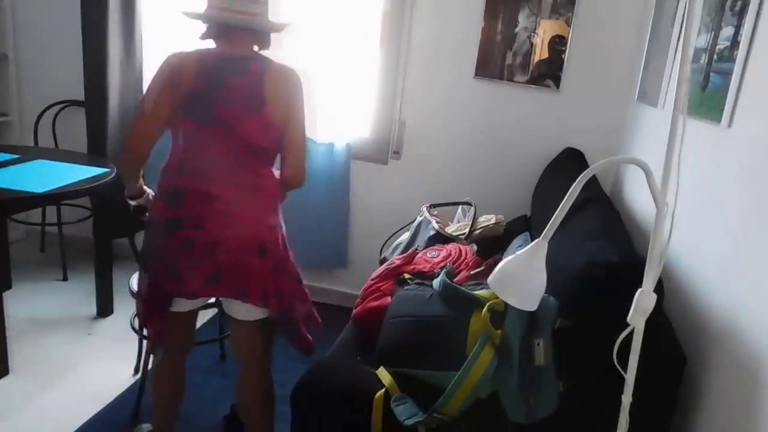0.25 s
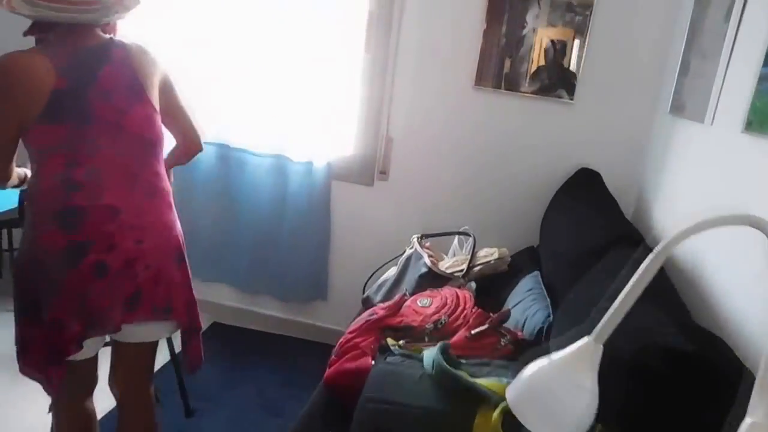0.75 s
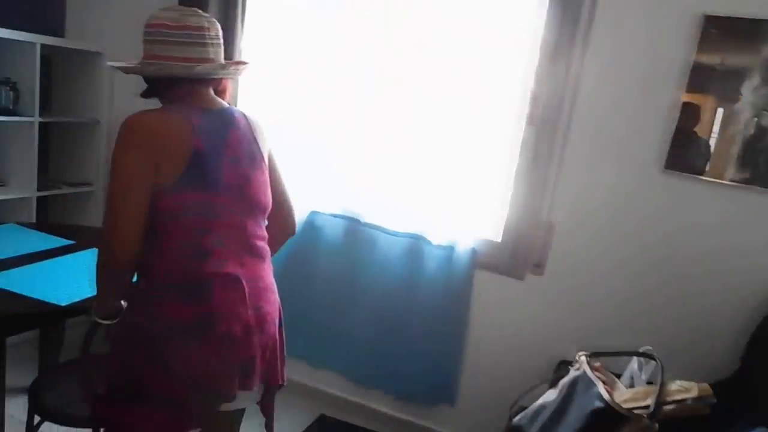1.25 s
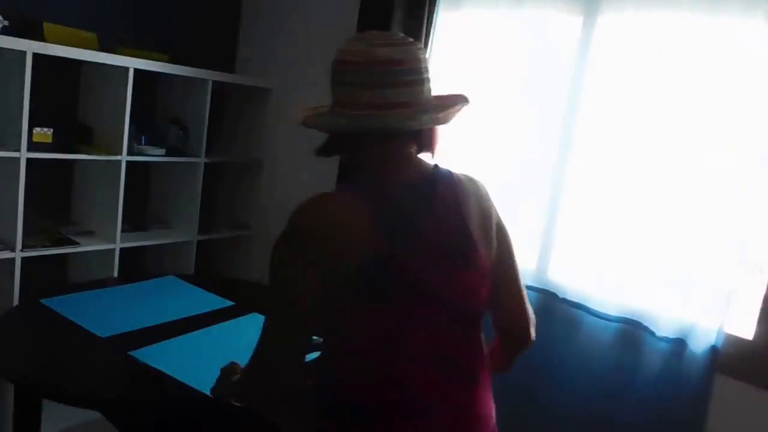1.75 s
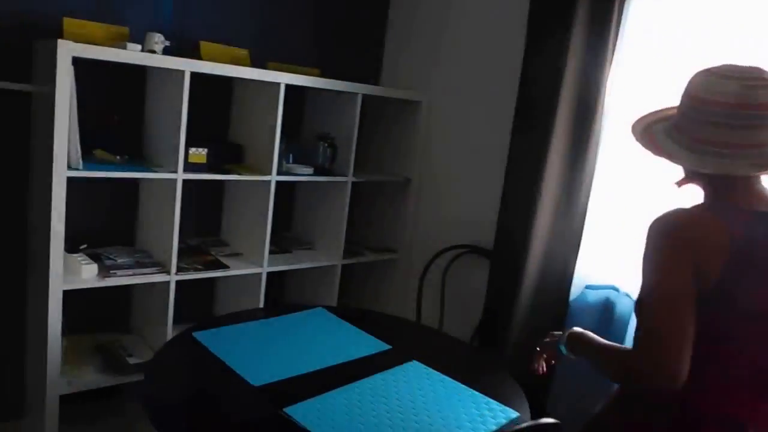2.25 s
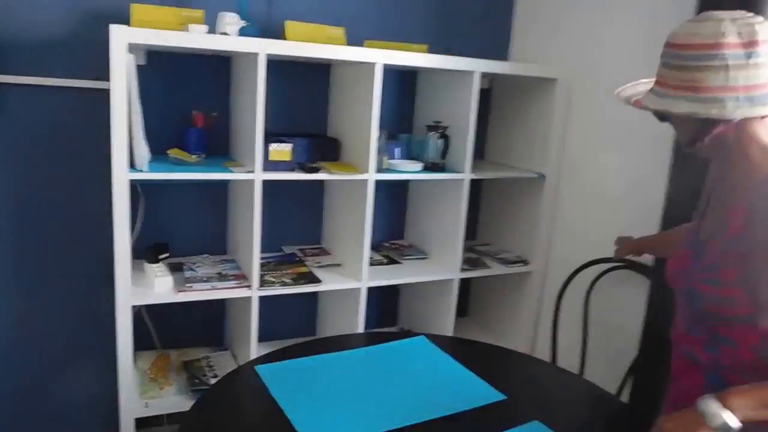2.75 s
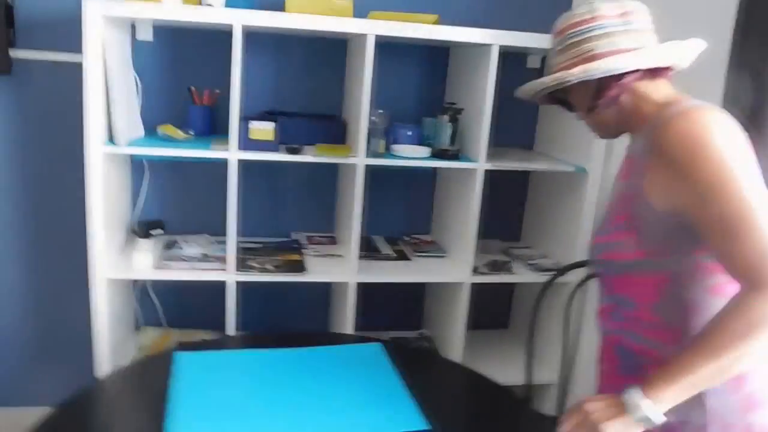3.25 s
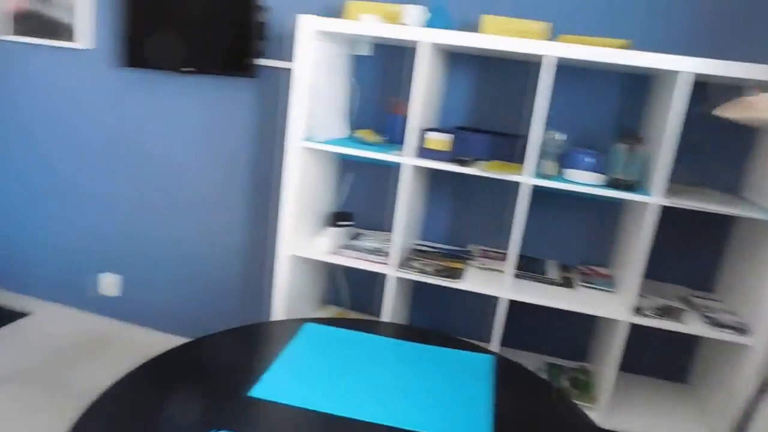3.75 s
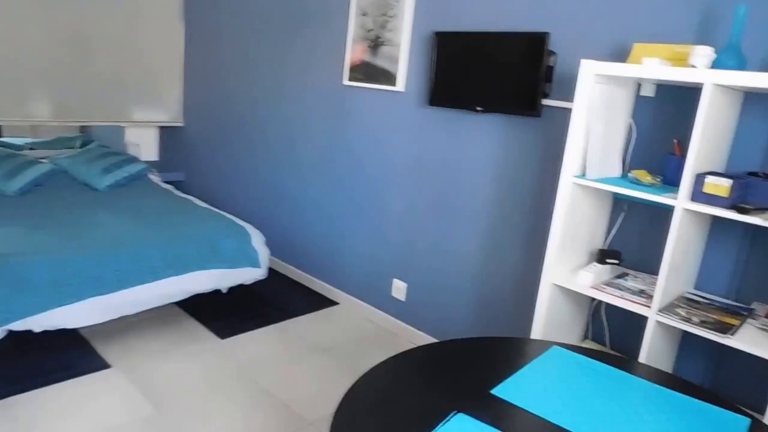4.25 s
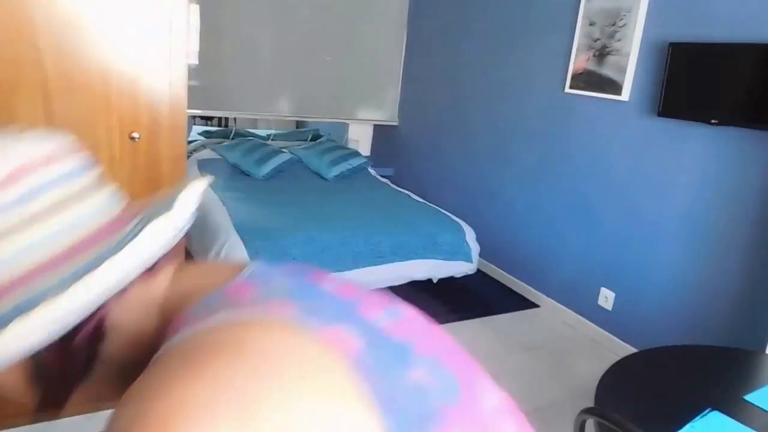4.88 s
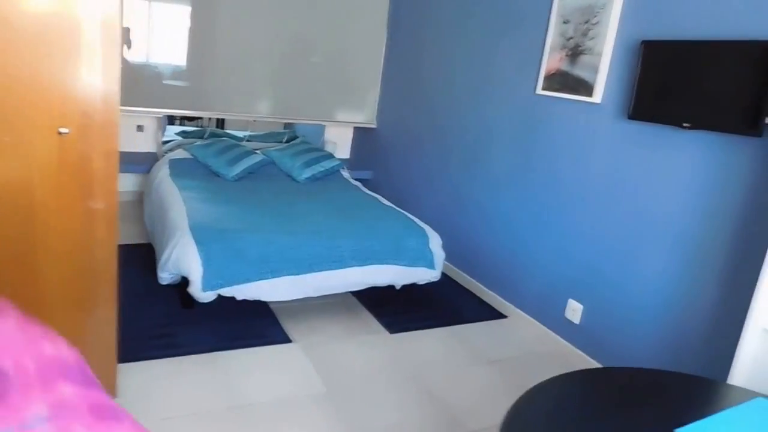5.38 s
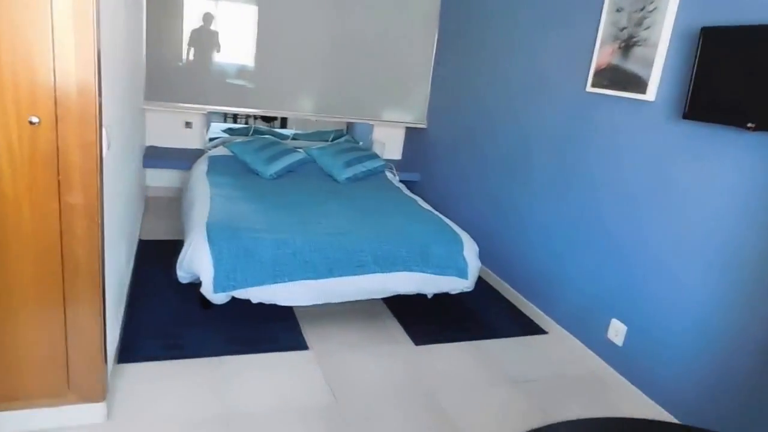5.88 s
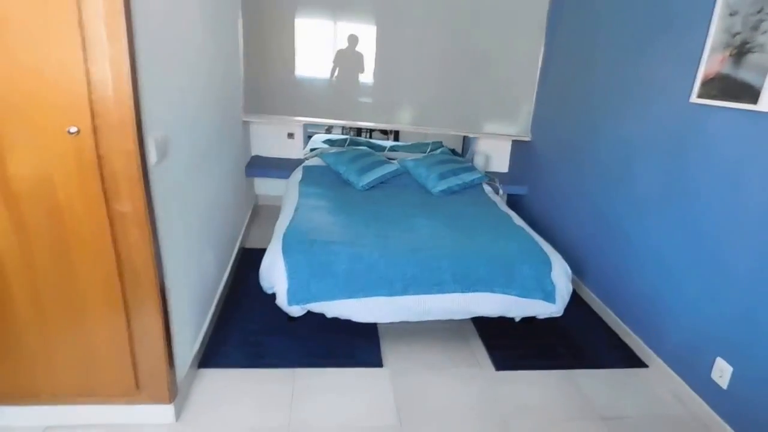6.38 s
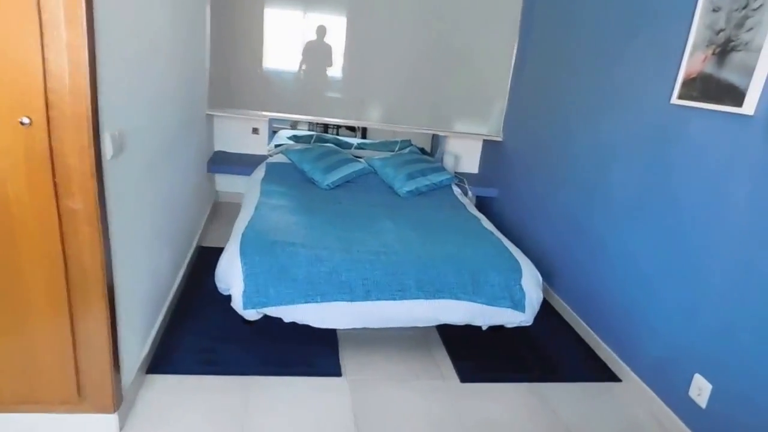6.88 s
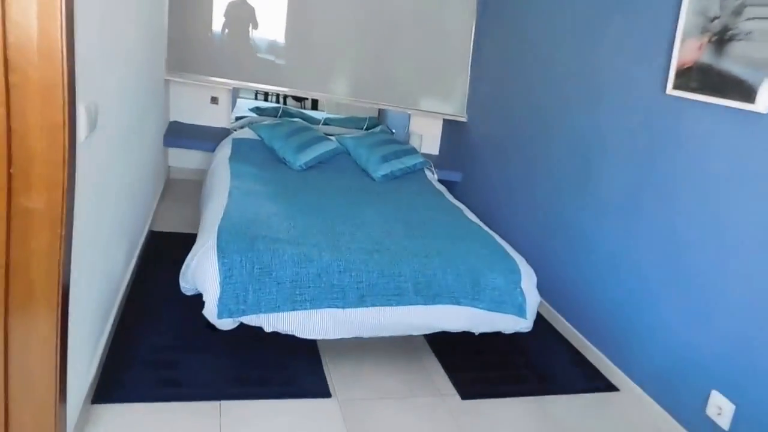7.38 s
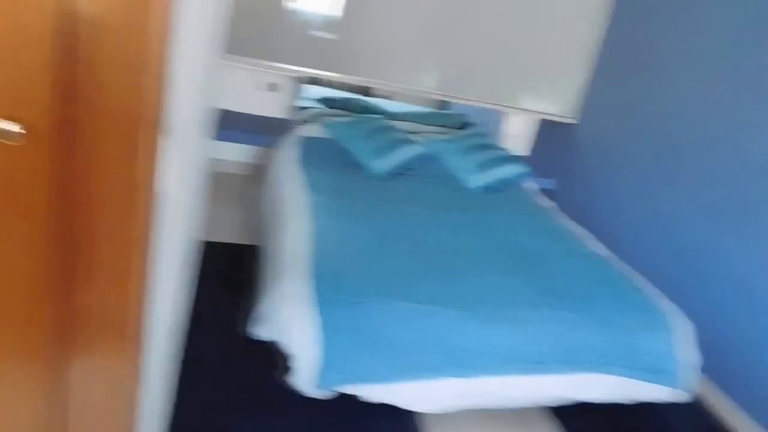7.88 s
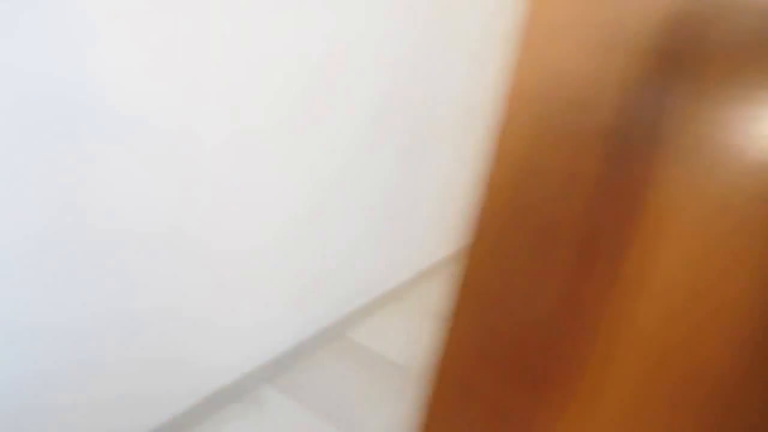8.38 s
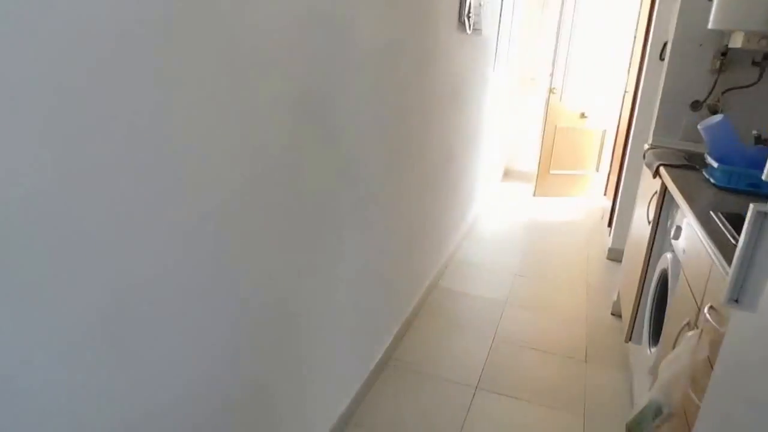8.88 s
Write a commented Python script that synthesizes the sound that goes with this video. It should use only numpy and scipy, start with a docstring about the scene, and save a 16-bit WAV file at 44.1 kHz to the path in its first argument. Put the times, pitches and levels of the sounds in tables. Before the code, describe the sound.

Two rough, squeaky scrapes of a tubular chair on a tiled floor, a pause between them, followed by faint shuffling, clicks and hiss.

```python
"""Close stereo take in a small, quiet, hard-walled room: hiss, faint hum, cloth, a tick and a soft step.
From 1.2 s a tubular metal chair is dragged over tiles, and after a pause with soft steps again from 3.1 s:
random micro-impacts grind, noise blows knock at tile joints, harmonic stacks squeal, single tones sing.
After 4.5 s thuds and a rustle, a low falling chirp and a dull tap follow; steps, ticks and swishes,
made of filtered noise bursts, run on to the end over the shuffling hiss."""
import sys
import numpy as np
from scipy import signal
from scipy.fft import rfft, irfft, next_fast_len
from scipy.io import wavfile
from scipy.ndimage import map_coordinates

SR = 44100
rng = np.random.default_rng(int(sys.argv[2]) if len(sys.argv) > 2 else 0)


def wrap_up_sound(samples):
    """Save the sound to the file named by the first command line argument, as 16-bit audio."""
    columns = np.atleast_2d(samples).T
    # keep every value between -1 and 1, then stretch to whole-number steps
    tamed = np.clip(columns, -1, 1)
    steps = np.round(tamed * 32767).astype(np.int16)
    wavfile.write(sys.argv[1], SR, steps)


def makeup_ratio(level_db):
    """Linear amplitude ratio for a level in decibels (20 dB per factor of ten)."""
    decades = np.asarray(level_db, float) / 20
    return 10 ** decades


N = 403074

# resonances of the chair's tubes: pitch_hz, width_hz, level_db (over the plain force)
FRAME_MODES = [(252, 12, 4), (318, 20, 3), (380, 20, 2), (620, 35, -1), (695, 35, -2), (835, 35, -1),
               (890, 30, 1), (965, 30, 1), (1085, 30, 2), (1140, 30, 1), (1240, 35, -3), (1375, 35, -4),
               (1468, 25, 2), (1530, 35, 0), (1620, 35, 2), (1720, 35, 1), (1790, 35, 1), (1890, 35, 2),
               (1960, 35, 0), (2020, 35, 1), (2070, 35, 1), (2190, 35, 2), (2300, 35, 2), (2380, 35, 2),
               (2480, 40, 1), (2570, 40, 2), (2700, 40, 1), (2840, 45, -1), (3190, 45, -1), (3620, 50, 1),
               (3790, 50, 0), (4600, 80, 0), (5500, 90, 0), (5810, 150, 2), (6760, 60, 1), (7500, 60, 2),
               (8200, 100, 1)]


def rms_one(x):
    """Scale to rms 1."""
    return x / np.sqrt(np.mean(x ** 2) + 1e-20)


def in_time(rows, fade_s):
    """Columns as curves per sample, after a gate that fades in and out at the table's ends."""
    s, *columns = np.transpose(rows)
    t = np.arange(N) / SR
    gate = np.clip(np.minimum(t - s[0], s[-1] - t) / fade_s, 0, 1)
    return [gate] + [np.interp(t, s, c) for c in columns]


def colour(x, points):
    """Shape a steady signal by a spectrum of (Hz, dB) points, joined over log frequency."""
    size = next_fast_len(x.shape[-1])
    hz = np.maximum(np.arange(size // 2 + 1) * SR / size, 1)
    point_hz, point_db = np.transpose(points)
    gain = makeup_ratio(np.interp(np.log(hz), np.log(point_hz), point_db))
    return irfft(rfft(x, size) * gain, size)[..., :x.shape[-1]]


def band(x, low_hz, high_hz):
    """Butterworth band-pass."""
    edges_hz = [low_hz, min(high_hz, .45 * SR)]
    return signal.sosfilt(signal.butter(3, edges_hz, "band", fs=SR, output="sos"), x)


def flutter_noise(low_hz, high_hz):
    """Band of noise with rms 1, for fast uneven modulation."""
    return rms_one(band(rng.standard_normal(N), low_hz, high_hz))


def drift(rate_hz):
    """Slow random wander of rms 1, drawn at 60 points a second."""
    steps = rng.standard_normal(int(N / SR * 60) + 2)
    r = np.exp(-2 * np.pi * rate_hz / 60)
    wander = rms_one(signal.lfilter([1], [1, -r], steps))
    return np.interp(np.arange(N) * 60 / SR, np.arange(len(steps)), wander)


def resonate(x, hz, width_hz):
    """Two-pole resonance with gain 1 on top."""
    r = np.exp(-np.pi * width_hz / SR)
    zeros = np.array([1, 0, -1]) * (1 - r * r) / 2
    return signal.lfilter(zeros, [1, -2 * r * np.cos(2 * np.pi * hz / SR), r * r], x)


def bursts(events, shape):
    """Place a dying noise burst, filtered by shape and scaled to its peak, at each event."""
    out, t = np.zeros(N + SR), np.arange(SR // 2) / SR
    noises = rng.standard_normal((len(events), SR // 2))
    for (s, peak_db, hz, t60_s), noise in zip(events, noises):
        burst = shape(noise * makeup_ratio(-60 * t / max(t60_s, .002)), hz)
        at = round(s * SR)
        out[at:at + len(t)] += burst / np.abs(burst).max() * makeup_ratio(peak_db)
    return out[:N]


def roll_in(rise_s):
    """Linear rise that softens the start of a burst."""
    return np.minimum(np.arange(SR // 2) / (rise_s * SR), 1)


def left_right(pan_db):
    """Gains of left and right that differ by pan_db."""
    return makeup_ratio(np.array([[pan_db], [-pan_db]]) / 2)


def swell_db(s, held_s):
    """Time since the start, and an envelope in dB that swells, holds and dies."""
    catch_db_per_s, let_go_db_per_s = 702, 461
    t = np.arange(N) / SR - s
    return t, np.minimum(0, np.minimum(catch_db_per_s * t, let_go_db_per_s * (held_s - t)))


def hum():
    """Faint hum: narrow bands of noise, each 12 Hz wide."""
    # low hum bands: pitch_hz, level_db
    hum_bands = [(65, -94), (155, -91), (305, -83)]
    return sum(makeup_ratio(db) * rms_one(resonate(rng.standard_normal(N), hz, 12.0)) for hz, db in hum_bands)


def hiss():
    """Air and microphone hiss as wide noise; shuffling lifts the middle more than the treble."""
    # the hiss swells as feet and clothes shuffle: start_s, level_db (500-4000 Hz)
    shuffle = [(0.0, -55), (0.424, -55.5), (1.19, -55.5), (2.128, -57.5), (2.744, -56), (3.07, -55),
               (5.016, -55.5), (5.98, -55.5), (6.56, -54), (7.25, -55.5), (8.48, -54.5), (8.8, -56.5),
               (9.14, -53.5)]
    # spectrum of the hiss: frequency_hz, relative density_db (per Hz)
    hiss_spectrum = [(15, -45), (25, -16), (65, -14.5), (96, -13.5), (276, -16.5), (429, -13), (488, -9.5),
                     (906, -5), (1370, -2), (1770, -0.5), (2610, -0.5), (9510, -14.5), (12000, -13),
                     (15600, -12), (22000, -120)]
    # stereo width of the hiss: frequency_hz, side_db (against the middle)
    hiss_side = [(60, -16), (110, -14), (200, -10), (350, -10), (630, -11), (1150, -10), (2070, -12),
                 (3730, -8), (6720, -5), (12100, -5)]
    _, level_db = in_time(shuffle, 1)
    mid, side = colour(rng.standard_normal((2, N)), hiss_spectrum)
    both = (mid + colour(side, hiss_side) * [[1], [-1]]) / np.std(band(mid, 500, 4000))
    upper = signal.sosfilt(signal.butter(1, 3500, "high", fs=SR, output="sos"), both)
    # the treble follows only part of the swell
    steadied = makeup_ratio(-.6 * (level_db - np.mean(level_db))) - 1
    return makeup_ratio(level_db + 1.26 * drift(4.8)) * (both + steadied * upper)


def thuds():
    """The floor slab booms under weight: noise through two equal resonances gives one low note."""
    # booms: start_s, peak_db, pitch_hz, t60_s (of the noise fed in)
    booms = [(0.542, -70, 99, 0.7), (1.219, -55, 109, 0.29), (1.289, -54, 101, 0.53),
             (4.072, -62, 93, 0.43), (4.729, -70, 69, 0.4), (4.849, -94, 67.3, 0.44),
             (5.679, -67, 61, 0.57), (6.018, -81, 135, 0.57)]
    return bursts(booms, lambda noise, hz: resonate(resonate(noise, hz, 0.14 * hz), hz, 0.14 * hz))


def rustles():
    """Cloth rustles briefly: soft swishes of noise two octaves wide."""
    # swishes: start_s, peak_db, pitch_hz, t60_s (of the noise fed in)
    swishes = [(0.2892, -46, 2380, 0.67), (1.04, -46, 2400, 0.37), (2.88, -43, 2580, 0.25),
               (4.7195, -43, 2800, 0.83), (6.5194, -46, 2500, 0.57), (6.9793, -44.5, 2320, 1),
               (7.7787, -39.5, 2480, 0.18), (8.2394, -42.5, 2760, 0.67), (8.5035, -43.5, 2450, 0.95),
               (8.6292, -46, 2570, 0.17)]
    rise = roll_in(0.0036)
    return bursts(swishes, lambda noise, hz: band(noise * rise, .5 * hz, 2 * hz))


def footsteps():
    """Soft footfalls: dull puffs of noise that roll on over 10 ms."""
    # footfalls: start_s, peak_db, pitch_hz, t60_s (of the noise fed in)
    footfalls = [(0.553, -41, 1180, 0.27), (2.381, -47, 1280, 0.44), (2.784, -39.5, 1520, 0.15),
                 (6.378, -47.5, 1280, 1), (6.497, -43, 1400, 0.35), (7.856, -42, 1150, 0.47),
                 (8.239, -46, 1410, 0.069), (8.499, -45, 1550, 0.53)]
    rise = roll_in(0.01)

    def puff(noise, hz):
        return rise * (resonate(noise, hz, 0.7 * hz) + 0.21 * band(noise, 370, 1640))
    return bursts(footfalls, puff)


def ticks():
    """Small dry ticks close by: brief snaps of resonant noise, each with its own left-right balance."""
    # snaps: start_s, peak_db (before panning), pitch_hz, t60_s (of the noise fed in), left_right_db
    snaps = [(0.473, -38, 6200, 0.029, 5), (1.9064, -38, 2290, 0.022, 0.5), (6.687, -35.5, 7150, 0.021, 6),
             (6.69, -42, 6000, 0.26, 11), (7.418, -50, 2660, 0.015, 29), (7.78, -40, 2520, 0.011, -1),
             (7.791, -43, 3500, .02, 19), (7.8452, -36, 8140, 0.0077, 4), (7.848, -37, 5500, 0.011, 8),
             (7.9587, -35.5, 9700, 0.021, 13), (7.969, -44, 3800, 0.079, 3)]

    def snap(noise, hz):
        return resonate(noise, hz, .5 * hz) + 0.24 * band(noise, 1100, 17000)
    return sum(bursts([row[:4]], snap) * left_right(row[4]) for row in snaps)


def chirp():
    """A short low tone whose pitch falls steadily."""
    # one falling tone: start_s, held_s, pitch_hz, glide_hz_per_s, level_db
    s, held_s, hz, glide, level_db = (5.265, .035, 450, -800, -61)
    t, envelope_db = swell_db(s, held_s)
    return np.sqrt(2) * makeup_ratio(level_db + envelope_db) * np.sin(2 * np.pi * (hz + glide * t / 2) * t)


def bump():
    """A jolt reaches the microphone: one smooth swing down and up."""
    # one jolt: centre_s, width_s, peak_db (before panning), left_right_db
    s, width_s, level_db, pan_db = (4.322, .0035, -51, 4)
    u = (np.arange(N) / SR - s) / width_s
    return u * np.exp(.5 - u * u / 2) * makeup_ratio(level_db) * left_right(pan_db)


def tap():
    """Something hard is set down: a dull tap of resonant noise with a short tail."""
    # layers of the tap: start_s, peak_db, pitch_hz, t60_s (of the noise fed in)
    tap_layers = [(6.0095, -29, 1380, .09), (6.0095, -33, 2550, .06), (6.012, -37, 1500, .35)]
    return bursts(tap_layers, lambda noise, hz: resonate(noise, hz, .3 * hz) + .3 * band(noise, 600, 4200))


def room(direct, sent):
    """Direct sound, then a dense dying tail that loses treble first; its side part has its own spectrum."""
    # side part of the tail: frequency_hz, side_db (gain from the direct sound)
    room_side = [(60, -6), (110, -13), (200, -26), (350, -27), (630, -29), (1150, -22), (2070, -18),
                 (3730, -13), (6720, 0), (9000, 0), (12100, -4)]
    t60_s = .28   # the treble dies in half that time
    t = np.arange(SR // 2) / SR
    noise = rng.standard_normal((2, len(t)))
    dull = signal.lfilter([.35], [1, -.65], noise)
    mid, side = dull * makeup_ratio(-60 * t / t60_s) + .5 * (noise - dull) * makeup_ratio(-60 * t / (.5 * t60_s))
    mid = mid * (t > .003)   # the middle's first reflections come after 3 ms
    mid = mid / np.linalg.norm(mid)
    side = side / np.linalg.norm(side)
    wide = colour(signal.fftconvolve(direct, side)[:N], room_side)
    return direct + signal.fftconvolve(sent, mid)[:N] + wide * [[1], [-1]]


def single_tones():
    """Tubes ringing, and some high partials of the squeals: each one tone that swells, flutters and fades."""
    # single tones: start_s, held_s, pitch_hz, level_db (before flutter)
    tones = [(1.31, 0.02, 1095, -35), (1.32, 0.12, 1367, -37.5), (1.375, .06, 1675, -34),
             (1.375, .02, 2360, -38), (1.43, 0.083, 846, -40.5), (1.575, .04, 249, -55),
             (1.612, 0.056, 1140, -35.5), (1.615, 0.11, 1986, -43), (1.625, .11, 900, -39),
             (1.635, 0.025, 2170, -37), (1.7, 0.084, 1162, -38), (1.805, .025, 4670, -49),
             (1.822, 0.018, 3465, -45), (1.89, .12, 1150, -64.5), (3.13, .04, 1907, -43),
             (3.18, 0.018, 2010, -37), (3.21, .02, 1883, -41), (3.245, .02, 1090, -37),
             (3.265, 0.084, 250, -55), (3.265, .07, 328.5, -50.5), (3.29, .05, 400, -49.5),
             (3.635, .02, 1440, -40.5), (3.275, .04, 1246, -38), (3.275, 0.055, 2296, -35),
             (3.3, 0.03, 1470, -35.5), (3.335, .045, 1090, -41), (3.36, .02, 881, -40),
             (3.39, 0.017, 1113, -56), (3.452, .04, 1908, -41.5), (3.452, .02, 1118, -39),
             (3.515, 0.082, 846, -41.5), (3.545, .02, 2010, -38.5), (3.79, .05, 2310, -41),
             (3.82, 0.11, 1632, -46), (3.85, .025, 1617, -36), (3.853, 0.017, 1810, -35),
             (3.885, 0.081, 2060, -38), (4.0, 0.025, 806, -35), (4.01, .03, 317, -50),
             (4.035, 0.041, 1810, -37), (4.09, .11, 905, -38), (4.09, .03, 2560, -37),
             (4.12, .09, 249.7, -54), (4.13, .07, 1280, -39), (4.25, 0.057, 250, -49.5),
             (4.26, 0.025, 371, -46), (4.375, 0.023, 249, -52)]
    catch_db_per_s, fade_db_per_s, flutter_db = 1100, 350, 3
    t, out = np.arange(N) / SR, np.zeros(N)
    flutter = [flutter_noise(10, 60) for _ in range(3)]
    for k, (s, held_s, hz, db) in enumerate(tones):
        on = slice(int((s - .1) * SR), int((s + held_s + .2) * SR))
        catch_db = catch_db_per_s * (t[on] - s)
        fade_db = fade_db_per_s * (s + held_s - t[on])
        envelope_db = np.minimum(0, np.minimum(catch_db, fade_db))
        wobble = .2 * flutter[(k + 1) % 3][on]   # radians
        level = makeup_ratio(db + envelope_db + flutter_db * flutter[k % 3][on])
        out[on] += np.sqrt(2) * level * np.sin(2 * np.pi * hz * t[on] + wobble)
    return out


def squeals():
    """A foot sticks and slips near-periodically: a short harmonic stack whose uneven timing blurs its top."""
    # slips in step with a leg: start_s, held_s, slip_rate_hz, partial_1_db, partial_2_db (before chatter)
    slips = [(1.35, 0.038, 818, -31, -36), (1.53, 0.048, 1156, -38, -55), (1.794, .004, 1142, -28, -44),
             (1.815, .018, 1152, -27, -43), (3.146, 0.0084, 1001, -33.5, -54), (3.18, 0.012, 967, -32, -37),
             (3.197, 0.0051, 1063, -30, -44), (3.205, 0.0072, 927, -44, -33),
             (3.218, 0.012, 1114, -36, -56), (3.238, 0.01, 1238, -28, -57), (3.57, 0.033, 1052, -35.5, -61),
             (3.625, 0.03, 1093, -29.5, -40.5), (3.665, 0.044, 1091, -33, -43.5),
             (3.768, .015, 853, -37, -31), (3.79, .045, 853, -35, -26.5), (3.845, .045, 853, -36, -35),
             (3.905, .045, 853, -37, -30), (3.855, 0.032, 2290, -31.5, -54), (3.92, 0.034, 2266, -37, -58),
             (3.96, 0.016, 865, -35, -50), (4.1, 0.038, 1113, -34, -44), (4.03, 0.014, 863, -30, -52),
             (4.052, 0.062, 1471, -32, -47), (4.181, 0.045, 1080, -35, -47)]
    # partials 3, 4 and 5: level_db (against the weaker of the first two)
    upper_partials_db = [-2, -11, -20]
    waver, chatter_db = .0014, 1.4   # pitch waver as a share; rms of the level chatter
    out = np.zeros(N)
    uneven = .16 * flutter_noise(15, 150)   # radians of the slip cycle
    shaky = makeup_ratio(0.9 * drift(29)) * makeup_ratio(chatter_db * flutter_noise(20, 120))
    lead_s = np.cumsum(waver * flutter_noise(6, 40)) / SR
    for s, held_s, hz, first_db, second_db in slips:
        t, envelope_db = swell_db(s, held_s)
        on = envelope_db > -60
        phase = 2 * np.pi * hz * (s + t[on] + lead_s[on]) + uneven[on]
        weaker_db = min(first_db, second_db)
        levels_db = [first_db, second_db] + [weaker_db + db for db in upper_partials_db]
        for k, db in enumerate(levels_db):
            # higher partials come late and go early
            level = makeup_ratio(db + (1 + 0.73 * k) * envelope_db[on])
            out[on] += np.sqrt(2) * level * np.sin((k + 1) * phase)
    return out * shaky


def knocks():
    """A foot strikes a tile joint: a sharp crack, then the frame rings and dies."""
    # blows: start_s, peak_db, hardness_hz (top of the band), t60_s (of the noise fed in)
    blows = [(1.215, -56, 3460, 0.13), (1.2836, -11, 2950, 0.032), (1.3095, -11.5, 6000, 0.074),
             (1.329, -13.5, 4000, 0.045), (1.594, -16.5, 3900, 0.6), (3.122, -34.5, 3400, 0.1),
             (3.172, -22, 2980, 0.047), (3.182, -20, 2960, 0.071), (3.625, -29, 6000, 0.074),
             (3.991, -23, 4000, 0.095), (3.449, -17, 6500, 0.06), (4.256, -14, 8000, 0.12)]

    def blow(noise, hardness_hz):
        force = noise + 8.7 * (np.arange(len(noise)) == 0)
        # struck tubes ring with half as wide again resonances
        rung = sum(resonate(force, hz, 1.5 * width) * makeup_ratio(db) for hz, width, db in FRAME_MODES)
        return band(rms_one(rung) + .5 * rms_one(force), 520, hardness_hz)
    return bursts(blows, blow)


def frame(force, wander_db):
    """Tubes ring over the plain grind; each mode's pitch and level wander so that no steady band stands out."""
    # plain grind: frequency_hz, relative density_db (per Hz)
    grind_spectrum = [(60, -45), (100, -28), (150, -25), (209, -25), (247, -20), (320, -14), (507, -10),
                      (680, -4), (849, -2), (984, -4), (1100, -3), (1620, -2), (2380, -3), (3700, -11),
                      (4980, -14), (5880, -15), (7600, -17), (8990, -22), (11000, -20), (12300, -27),
                      (16000, -69), (22000, -120)]
    mode_shift = .012   # rms share of each mode's random pitch wander
    plain, samples = colour(force, grind_spectrum), np.arange(N)
    out = plain.copy()
    for hz, width_hz, db in FRAME_MODES:
        rung = resonate(plain * makeup_ratio(db + wander_db * drift(14)), hz, width_hz)
        bend = mode_shift * drift(6)
        # read the ringing at a wandering rate
        read_at = samples + np.cumsum(bend - bend.mean())
        out += map_coordinates(rung, [read_at], order=3, mode="reflect")
    return out


def grinding():
    """Thousands of uneven micro-impacts a second shake the frame; weight and speed set its colour."""
    # pushes of the drags, one list each: start_s, grinding_db, speed_db, weight_db (last two against the usual)
    pushes = [
        [(1.214, -38, 1.5, 11), (1.26, -40, 1, 3.5), (1.281, -51, 0, 3)],
        [(1.283, -21.5, -2, -7), (1.305, -25.5, 3, -1.5), (1.328, -23.5, 3, -1.5), (1.391, -28, -4, 0.5),
         (1.451, -34.5, 3.5, 2), (1.519, -31.5, -2, 6), (1.59, -36.5, 7.5, -4)],
        [(1.594, -27, 2.5, -10), (1.66, -25, 1.5, -3), (1.778, -41.5, -1.5, 6.5), (1.812, -40.5, 3, -14),
         (1.856, -45, -1, 7), (1.898, -56, 10, 13.5), (1.93, -81, 9, -4)],
        [(3.09, -57, 0, 3), (3.119, -54, 8, -3), (3.123, -40, -4, 7), (3.201, -35, -0.5, 3.5),
         (3.249, -34.5, -2, 9), (3.259, -24, 1, 1.5), (3.309, -23.5, 0, 1), (3.373, -38.5, -0.5, 6),
         (3.445, -57, 5, -6)],
        [(3.449, -24.5, -4, -9), (3.499, -37.5, -1, 5.5), (3.553, -35, -3.5, 3), (3.6, -42, 0, 2.5),
         (3.663, -32, 12.5, -8.5), (3.707, -41, 9, -1), (3.735, -37.5, -1, 5.5)],
        [(3.736, -37.5, -1, 1.5), (3.795, -34, 6, -7.5), (3.927, -25.5, -1, -2), (4.011, -30, 3, 3.5),
         (4.069, -29, 3, 5.5), (4.115, -28, 9, -0.5), (4.225, -30, 4, -2.5), (4.254, -22.5, 2, 0.5)],
        [(4.256, -24.5, 2.5, -0.5), (4.304, -23, 4.5, 0), (4.311, -24, 18, -9), (4.33, -27.5, 16, 0),
         (4.358, -24, 7.5, -2), (4.438, -44.5, 9, 9), (4.5, -64, 16, 3)],
    ]
    # body, grit, rumble: level_db (against the grinding), share of speed_db, share of weight_db
    colour_laws = [(-4.5, 0.02, 1.06), (-14, 0.97, 0.14), (-27, 0.61, 0.83)]
    sizes = makeup_ratio(2.2 * np.minimum(rng.exponential(1, N), 5)) * rng.choice([-1, 1], N)
    force = sizes * (rng.random(N) < 3000 / SR) * makeup_ratio(1.2 * drift(25))   # 3000 impacts a second
    # the feet stick and slip some hundred times a second, by 1.5 dB rms
    force = force * makeup_ratio(1.5 * flutter_noise(40, 160))
    shaken = frame(force, wander_db=4.0)
    edges_hz = ((1500, 4200), (450, 1500), (4200, 12500), (90, 450))
    core, body, grit, low = [rms_one(band(shaken, *edges)) for edges in edges_hz]
    low = low * makeup_ratio(3 * drift(6))   # the rumble comes and goes
    out, rumble = np.zeros(N), np.zeros(N)
    for rows in pushes:
        gate, level_db, speed_db, weight_db = in_time(rows, 0.00018)
        body_gain, grit_gain, rumble_gain = [makeup_ratio(db + fast * speed_db + heavy * weight_db)
                                             for db, fast, heavy in colour_laws]
        out += gate * makeup_ratio(level_db) * (core + body_gain * body + grit_gain * grit)
        slow_gate = in_time(rows, .015)[0]   # the lows start slowly
        rumble += slow_gate * makeup_ratio(level_db) * rumble_gain * low
    return band(out, 380, 19000) + band(rumble, 70, 600)


def scene():
    """Chair in the room, with small sounds, hiss and hum around it."""
    rough = grinding() + knocks()
    tonal = squeals() + single_tones()
    chair = room(rough + tonal, makeup_ratio(-10) * rough + makeup_ratio(-21) * tonal)   # tones feed the tail less
    small_sounds = bump() + tap() + ticks() + footsteps() + rustles() + thuds() + chirp()
    return chair + small_sounds + hiss() + hum()


def roll_off(x):
    """The treble ends steeply here."""
    return signal.sosfilt(signal.butter(12, 12720, fs=SR, output="sos"), x)


def record(dry):
    """The stereo microphone's left port is a touch more sensitive, and the top is cut steeply."""
    cut = signal.cheby2(12, 60, 12750, fs=SR, output="sos")
    heard = signal.sosfilt(cut, dry * makeup_ratio([[.15], [-.15]]))
    return roll_off(heard)


dry = scene()
out = record(dry)
wrap_up_sound(out)
```